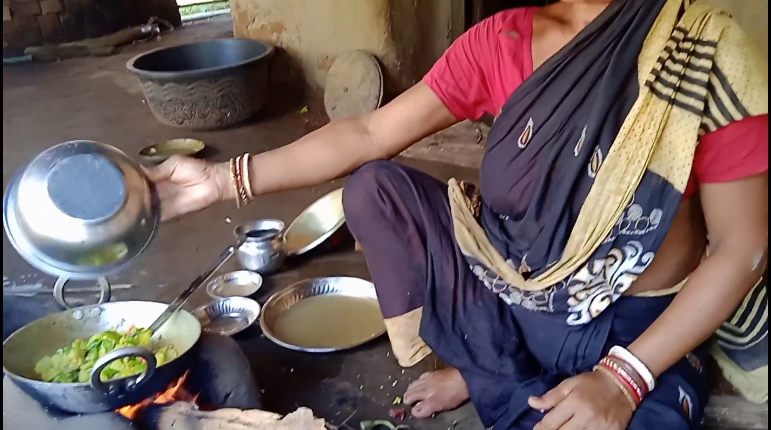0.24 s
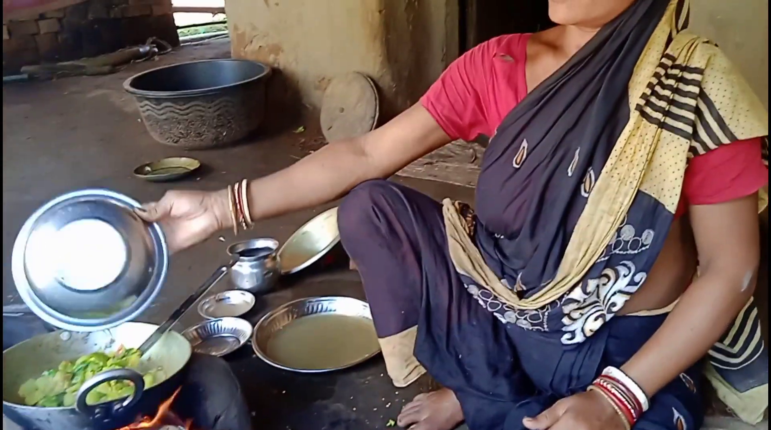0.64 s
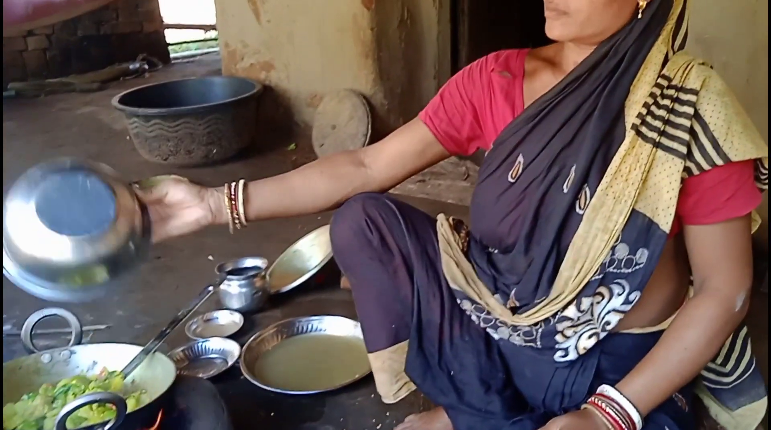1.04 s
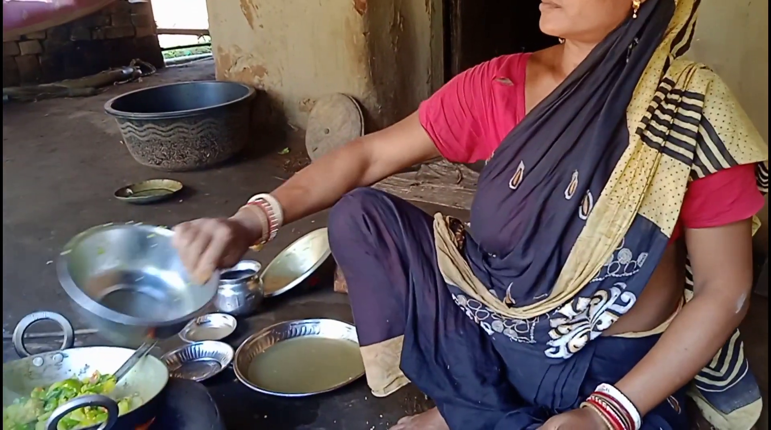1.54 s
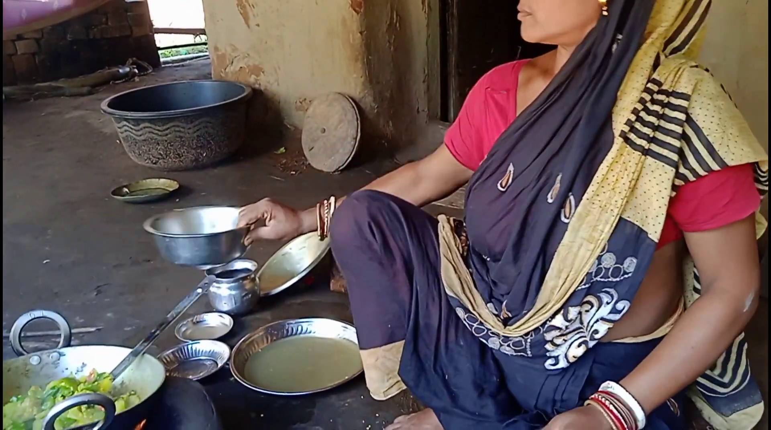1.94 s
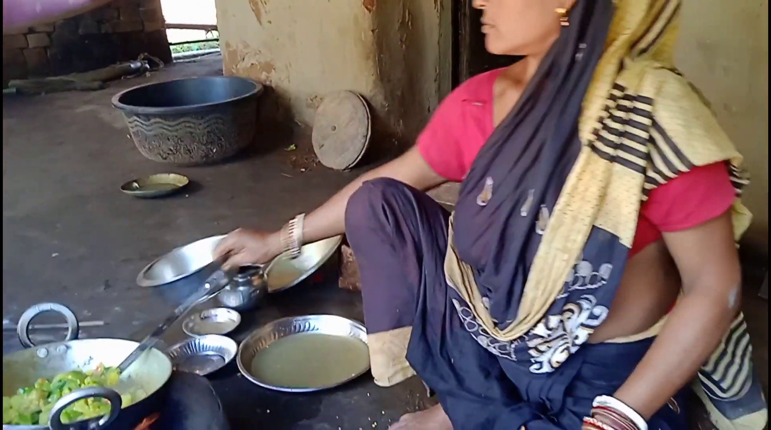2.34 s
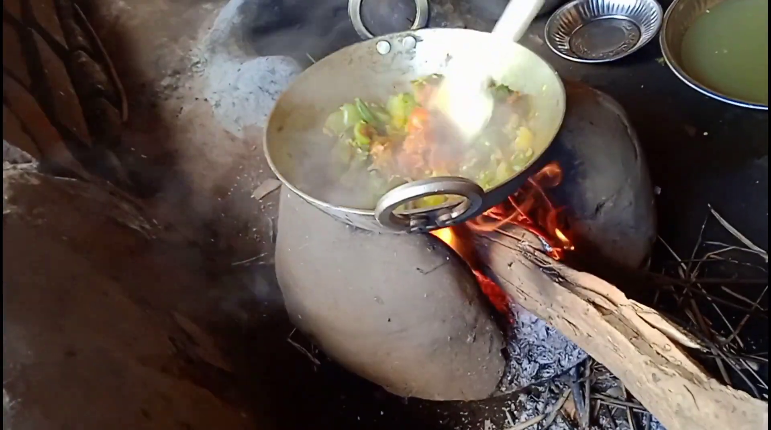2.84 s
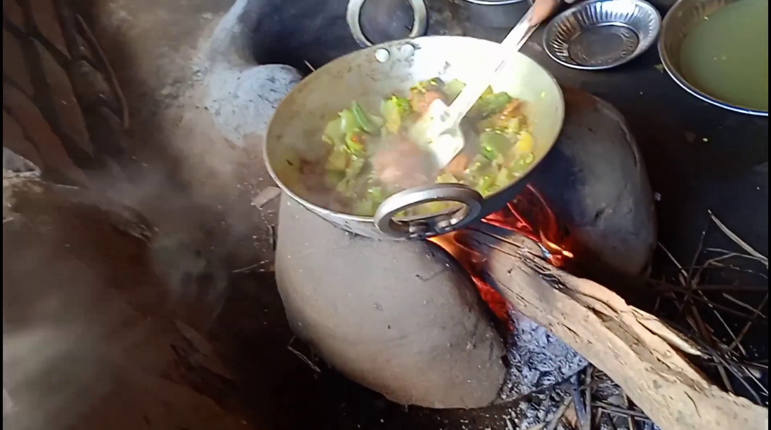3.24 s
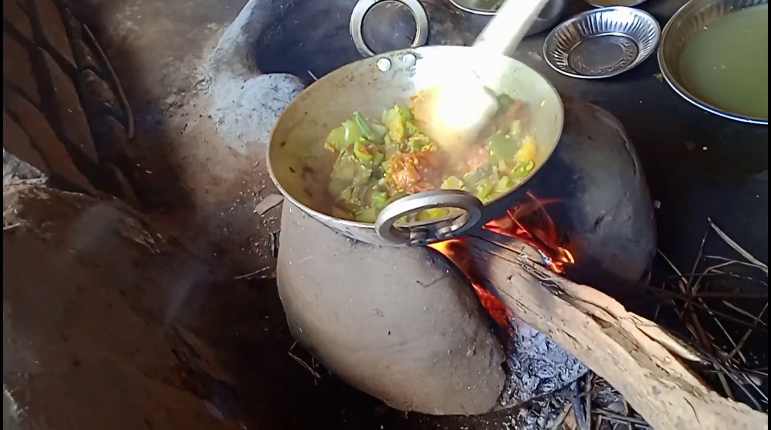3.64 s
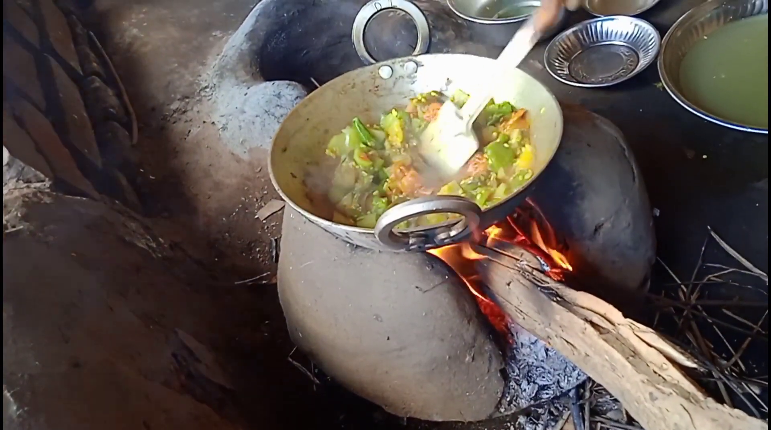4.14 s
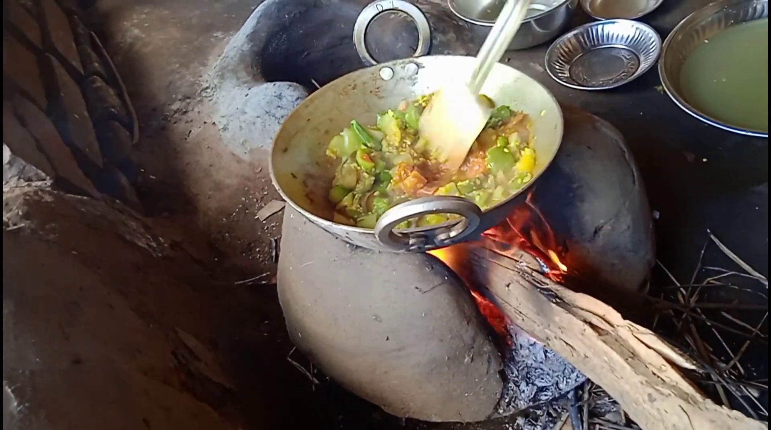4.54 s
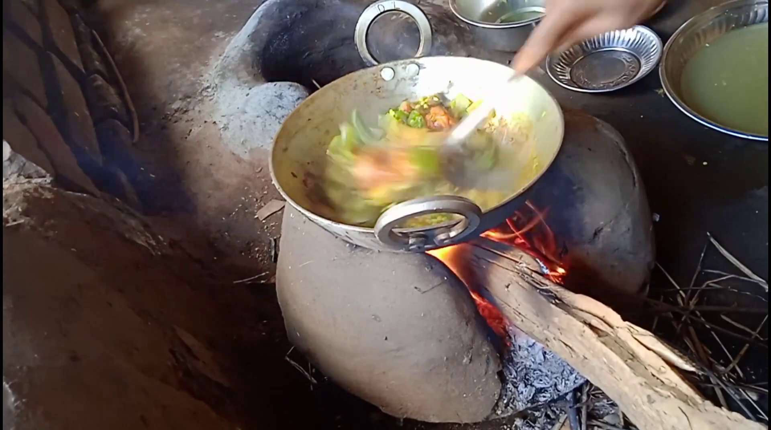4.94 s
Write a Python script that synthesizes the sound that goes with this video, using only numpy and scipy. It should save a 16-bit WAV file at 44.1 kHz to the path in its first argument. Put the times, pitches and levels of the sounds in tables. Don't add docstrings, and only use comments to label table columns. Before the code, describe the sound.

Steady bright frying sizzle, first across the floor then close by, with soft thumps, faint bowl ticks and metallic spatula strikes near the end.

```python
import sys
import numpy as np
from scipy import signal
from scipy.fft import rfft, irfft, next_fast_len
from scipy.io import wavfile
from scipy.ndimage import uniform_filter1d

SR = 44100
rng = np.random.default_rng(int(sys.argv[2]) if len(sys.argv) > 2 else 0)


def materialize(psi):
    bounded = np.clip(np.atleast_2d(psi).T, -1, 1)
    quanta = np.round(bounded * 32767).astype(np.int16)
    wavfile.write(sys.argv[1], SR, quanta)


def level_to_linear(level):
    exponent = np.asarray(level, float) / 20
    return 10 ** exponent


N = 228879
CUT_S = 1.662


def evened(x):
    return x / np.sqrt(np.mean(x ** 2) + 1e-20)


def read(points, hz):
    f, value = np.transpose(points)
    return np.interp(np.log(hz + 1), np.log(f + 1), value, -120, -120)


def add(mix, s, sound):
    part = mix[round(s * SR):][:len(sound)]
    part += sound[:len(part)]


def colour(x, points):
    size = next_fast_len(len(x))
    gain = level_to_linear(read(points, np.fft.rfftfreq(size, 1 / SR)))
    return evened(irfft(rfft(x, size) * gain, size)[:len(x)])


def resonate(x, hz, width):
    turn = np.exp(2j * np.pi * np.cumsum(hz * np.ones(len(x))) / SR)
    r = np.exp(-np.pi * width / SR)
    return 2 * (turn * signal.lfilter([1 - r], [1, -r], x / turn)).real


def drift(x, size, wide, long, depth_db, shared_db):
    overlap = size * 3 // 4
    z = signal.stft(x, nperseg=size, noverlap=overlap)[2]
    patches = uniform_filter1d(rng.standard_normal(z.shape), wide, 0)
    patches = evened(uniform_filter1d(patches, long, 1))
    flicker = evened(uniform_filter1d(rng.standard_normal(z.shape[1]), size=12))
    z = z * level_to_linear(depth_db * patches + shared_db * flicker)
    return signal.istft(z, nperseg=size, noverlap=overlap)[1][:N]


def bubbles(spread_db, hiss, patchy_db, flicker_db, whistle_db):
    bursts_per_s = 3000
    size = level_to_linear(spread_db * np.minimum(rng.exponential(1, N), 5)) * rng.choice([-1., 1.], N)
    crackle = evened(size * (rng.random(N) < bursts_per_s / SR)) + hiss * rng.standard_normal(N)
    patchy = drift(crackle, 256, 3, 30, patchy_db, flicker_db)
    return drift(patchy, 1024, 2, 10, whistle_db, 0)


def follow(t, near):
    # top of the swell in seconds, swell in dB,
    # length in seconds, depth from -1 (skim) to 1 (deep).
    stirs = [(0.933, 2, 0.056, 0.039), (0.634, 0.5, 0.15, -0.23), (1.675, 3, 0.096, -0.091),
             (1.917, 3.5, 0.31, 0.046), (2.245, 3, 0.27, -0.029), (3.143, 1.5, 0.12, 0.56),
             (3.44, 4, 0.13, 0.22), (3.6, 0, 0.11, -.3), (3.838, 1, 0.22, 0.82), (4.192, 4, 0.37, -0.24),
             (4.272, 1.5, 0.2, 0.75), (4.425, 0.5, .12, 0.23)]
    # time in seconds, boil in dB.
    boil_far = [
        (0, 4.5),
        (.5, 1),
        (1.18, -1),
        (1.27, -2.5),
        (1.66, -5),
    ]
    # time in seconds, boil in dB.
    boil_near = [
        (1.66, 0.5),
        (1.85, 2),
        (2.3, 1.5),
        (2.5, -0.5),
        (2.85, 0.3),
        (3.3, -2),
        (3.8, 2),
        (4.1, 0.5),
        (4.8, -3.5),
        (5.19, -1.5),
    ]
    # far level in dB, near level in dB, then dB per dB of boil, of swell and of deep swell.
    body, bright, mist = (-56, -51.5, 0.59, 0.74, 1.2), (-55, -55, 0.46, 1.05, -2.3), (-57.5, -57, 1.32, -0.07, 0)
    low, fire = (-67.5, -68.5, 0.55, 1.6, -0.5), (-66.5, -68, .1, 0.4, 3.5)
    s, swell_db, length, depth = np.transpose(stirs)[:, :, None]
    bump = swell_db * np.cos(np.pi * np.clip((t - s) / length, -.5, .5)) ** 2
    bump = bump * np.where(s > CUT_S, near, 1 - near)
    early, late = (np.interp(t, *np.transpose(boil)) for boil in (boil_far, boil_near))
    drives = np.where(t > CUT_S, late, early), bump.sum(0), (depth * bump).sum(0)
    return [far_db + near * (near_db - far_db) + np.dot(shares, drives)
            for far_db, near_db, *shares in (body, bright, mist, low, fire)]


def fizz(burst, near, body_db, bright_db):
    # frequency in Hz, level in dB per Hz.
    far_colour = [(710, -1), (1200, 1.5), (1410, -5.5), (1680, -2.5), (1860, 3), (2240, 5.5), (3080, 4.5),
                  (3440, 6), (4010, 6), (4320, -5), (5030, -19), (5850, -16), (6320, -19), (8200, -26),
                  (9000, -31), (11700, -44.5), (19800, -120)]
    # frequency in Hz, level in dB per Hz.
    near_colour = [(710, -19), (1200, -14), (1440, -5.5), (1740, -7), (1970, -9.5), (2240, -4.5),
                   (2380, -2.5), (2760, -5.5), (3080, -3), (3810, -2.5), (5070, -9), (6370, -3), (7050, -5),
                   (8270, -21.5), (9000, -23), (11700, -30.5), (19800, -120)]
    # frequency in Hz, width in Hz, level in dB.
    hum = [(715, 19, -8), (1466, 8.4, -5), (1624, 11, -4.5), (1895, 3.6, 3), (2000, 29, 5.5),
           (2040, 41, -2), (2413, 14, -2.5), (2530, 53, 0.5), (2710, 21, 3), (2856, 72, 3.5),
           (3250, 16, -5), (3340, 21, -14), (3780, 19, -3), (6130, 40, -14), (6020, 14, -10)]
    wall = evened(sum(level_to_linear(db) * evened(resonate(burst, hz, width)) for hz, width, db in hum))
    out = np.zeros(N)
    for share, shape, wall_db in (1 - near, far_colour, -19), (near, near_colour, -7.5):
        both = colour(burst, shape) + level_to_linear(wall_db) * wall
        body = signal.oaconvolve(both, signal.firwin(101, 4800, fs=SR), "same")
        out += share * (level_to_linear(body_db) * evened(body) + level_to_linear(bright_db + 1.02) * evened(both - body))
    return out


def fire_and_room(near, wash_db, fire_db):
    # frequency in Hz, level in dB per Hz.
    wash_far = [(24, -56), (40, -17), (135, -9.5), (253, -10), (294, -11), (494, -8), (627, -7), (717, -7),
                (1040, -5), (1400, -15.5), (1820, -58), (3080, -120)]
    # frequency in Hz, level in dB per Hz.
    wash_near = [(24, -57), (40, -22), (124, -6.5), (285, -11), (321, -19), (432, -11), (706, -8.5),
                 (772, -11), (1100, -14), (1400, -8), (1820, -35), (3080, -120)]
    fire = bubbles(spread_db=2.5, hiss=1.5, patchy_db=1.2, flicker_db=.5, whistle_db=2.6)
    wash = (1 - near) * colour(fire, wash_far) + near * colour(fire, wash_near)
    flames = signal.sosfiltfilt(signal.butter(2, 250, fs=SR, output="sos"), wash)
    return level_to_linear(wash_db) * (wash - flames) + level_to_linear(fire_db) * flames


def bowl_echo(burst, t):
    turn_s, turn_length_s = 1.31, .14
    echo_db = -69 + 8 * np.clip((t - turn_s) / turn_length_s, 0, 1)
    return level_to_linear(echo_db) * evened(resonate(resonate(burst, 3450, 610), 3450, 610))


def frying():
    # frequency in Hz, level in dB per Hz.
    spray_colour = [(4700, -17), (8000, -12), (10500, -10), (13400, -9.5), (13950, -5), (14500, 2),
                    (14950, 4.5), (15700, 2.5)]
    t = np.arange(N) / SR
    near = np.clip((t - CUT_S) / .002, 0, 1)
    body_db, bright_db, spray_db, wash_db, fire_db = follow(t, near)
    burst = bubbles(spread_db=0.0, hiss=1.0, patchy_db=0.16, flicker_db=-0.2, whistle_db=2.5)
    fine = bubbles(spread_db=-7, hiss=0.99, patchy_db=0.5, flicker_db=3.5, whistle_db=-1.5)
    out = fizz(burst, near, body_db, bright_db) + fire_and_room(near, wash_db, fire_db)
    out += level_to_linear(spray_db) * colour(burst + 0.62 * fine, spray_colour)
    return out + (1 - near) * bowl_echo(burst, t)


def knock(peak_db, hz, t60):
    t = np.arange(6000) / SR
    puff = resonate(rng.standard_normal(len(t)), 1.8 * hz, 0.91 * hz)
    puff = evened(resonate(puff, 1.8 * hz, 0.91 * hz)) * level_to_linear(-60 * t / 0.036)
    sag = np.clip((100 / hz) ** 2, 0, .55)
    turns = np.cumsum(hz * (1 - sag * np.tanh(t / 0.033))) / SR
    swing = level_to_linear(-60 * t / t60) * np.sin(2 * np.pi * (turns - .08))
    tap = (100 / hz) ** 2 * 0.75 * np.exp(-((t - .0005) / .0004) ** 2)
    return level_to_linear(peak_db) * ((swing + 0.34 * puff) * np.minimum(t / 0.0032, 1) - tap)


def ring(modes, t, spot_db, split):
    hz, db, t60 = np.transpose(modes)[:, :, None]
    phase, spot, twin = rng.random((3, len(hz), 1))
    twin_hz = hz * (1 + .012 * (twin + .3))
    pair = np.sin(2 * np.pi * (hz * t + phase))
    pair = pair + split * hz / 6000 * np.sin(2 * np.pi * (twin_hz * t + twin))
    return (level_to_linear(db + spot_db * spot - 60 * t / t60) * pair).sum(0)


def strikes(contacts, striker, vessel, crack_db, crack_t60, treble_db):
    # frequency in Hz, level in dB per Hz.
    crack_colour = [(150, -40), (460, -10), (1400, -15), (2200, -5), (3500, -7), (5000, -10), (6200, -4),
                    (7600, -8), (8600, -19), (11500, -17), (13900, -19), (14800, -8), (15600, -8)]
    t, out = np.arange(12000) / SR, np.zeros(N)
    lowpass = signal.firwin(63, 4800, fs=SR)
    for s, striker_db, vessel_db, thud_db in contacts:
        crack = colour(rng.standard_normal(len(t)), crack_colour) * level_to_linear(crack_db - 60 * t / crack_t60)
        thud = evened(resonate(resonate(rng.standard_normal(len(t)), 500, 520), 500, 520))
        thud = thud * level_to_linear(thud_db - 60 * t / 0.066)
        blade = ring(striker, t, spot_db=7, split=.8) + crack
        dull = signal.oaconvolve(blade, lowpass, "same")
        blade = dull + level_to_linear(treble_db) * (blade - dull)
        sound = level_to_linear(striker_db) * blade + level_to_linear(vessel_db) * ring(vessel, t, spot_db=3, split=.7) + thud
        add(out, s, sound * np.minimum(t / .0015, 1))
    return out


def bangle_ticks():
    # time in seconds, bangle, bowl and thud levels in dB.
    ticks = [
        (1.1925, -47, -49, -63),
        (1.199, -49, -53, -61),
        (1.208, -50, -57, -64),
        (1.224, -55, -52, -66),
        (1.236, -57, -62, -68),
    ]
    # mode in Hz, level in dB, t60 in seconds.
    bowl_modes = [(3009, -13, .09), (3332, -4, .1), (3688, -13, .08), (4400, -6, .05), (4990, 1, .06),
                  (5394, -10, .1), (5755, -11, .06), (6300, -15, .06), (7267, -17, .05)]
    return strikes(ticks, bowl_modes, bowl_modes, crack_db=1.5, crack_t60=.05, treble_db=1.5)


def spatula_strikes():
    # time in seconds, blade, pan and thud levels in dB.
    clinks = [
        (4.0378, -37, -46, -46),
        (4.043, -36, -48, -48),
        (4.0497, -30, -33, -42),
        (4.0555, -28, -42, -38),
        (4.060, -32, -48, -46),
        (4.065, -35, -38, -48),
        (4.071, -36, -46, -52),
        (4.077, -36, -44, -54),
        (4.085, -39, -50, -56),
    ]
    # time in seconds, blade, pan and thud levels in dB.
    clanks = [
        (5.098, -31, -48, -39),
        (5.107, -32, -48, -44),
        (5.1115, -31, -37, -39),
        (5.117, -33, -51, -42),
        (5.129, -36, -54, -48),
        (5.165, -41, -56, -56),
    ]
    # mode in Hz, level in dB, t60 in seconds.
    blade_modes = [(1250, -17, .05), (2260, -9, .06), (3540, -12, .05), (4100, -13, .035), (5300, -15, .05),
                   (5750, -14, .05), (6085, -7, .07), (6300, -11, .08), (6550, -13, .06), (6880, -9, .07),
                   (7300, -11, .05), (7470, -10, .04), (9800, -27, .05)]
    edge_modes = [(727, -13, .12), (1560, -13, .1), (2040, -10, .12), (2126, 2.5, .18), (2170, -11, .13),
                  (2500, -12, .12), (2840, -11, .35), (3540, -12, .12), (5275, -17, .15), (6150, -7, .13),
                  (6880, -10, .1)]
    wall_modes = [(674, -8, .12), (1130, -13, .2), (1583, -4, .3), (1820, -13, .15), (2126, -5, .15),
                  (2396, -11, .18), (2837, 0, .45), (3542, -1, .24), (5270, -11, .22), (5706, -13, .1),
                  (6110, -8, .18), (6896, -10, .13), (7305, -8, .1)]
    out = strikes(clinks, blade_modes, edge_modes, crack_db=-2.5, crack_t60=.07, treble_db=-1.5)
    return out + strikes(clanks, blade_modes, wall_modes, crack_db=-2.5, crack_t60=.07, treble_db=-4.5)


def scrape():
    # time in seconds, pressure in dB, hollow band in Hz.
    drag = [
        (4.13, -64, 645),
        (4.21, -51.5, 1080),
        (4.26, -50, 920),
        (4.3, -53, 730),
        (4.34, -56.5, 700),
        (4.41, -64, 700),
    ]
    lift_s, lift_db_per_s = 4.29, 110
    s, *columns = np.transpose(drag)
    t = np.arange(s[0], s[-1], 1 / SR)
    level_db, hz = (np.interp(t, s, c) for c in columns)
    squeak_db = -50.5 - lift_db_per_s * np.maximum(t - lift_s, 0)
    unevenness = evened(uniform_filter1d(rng.standard_normal(len(t)), 300))
    slips = rng.standard_normal(len(t)) * level_to_linear(2.5 * unevenness)
    hollow = evened(resonate(resonate(slips, hz, 960), hz, 960))
    squeak = evened(resonate(resonate(slips, 6000, 900), 6100, 900))
    sound = level_to_linear(level_db) * hollow + level_to_linear(squeak_db) * squeak
    return s[0], sound * signal.windows.tukey(len(t), .1)


def scene():
    # time in seconds, peak in dB, pitch in Hz, t60 in seconds.
    knocks = [(.328, -56, 95, 0.067), (.934, -58.5, 557, 0.094), (1.5432, -40, 105, 0.055),
              (1.829, -65, 200, 0.046), (1.928, -50.5, 266, 0.049), (2.24, -58, 603, 0.084),
              (2.515, -51.5, 410, 0.028), (2.792, -53, 474, 0.041), (3.161, -56, 306, 0.089),
              (3.4155, -39.5, 283, 0.029), (3.688, -50, 234, 0.059), (3.725, -48, 240, 0.025),
              (4.203, -45, 720, 0.054), (4.211, -44, 1340, 0.03), (4.22, -41.5, 1177, 0.1),
              (4.253, -50, 1200, .05), (4.241, -40, 760, .03), (4.249, -43, 735, 0.066),
              (4.283, -42, 567, 0.088), (4.29, -51, 720, 0.027), (4.312, -44, 725, 0.069),
              (4.348, -41, 538, 0.052), (4.352, -39.5, 734, 0.082), (3.417, -51, 450, 0.061),
              (3.69, -55, 420, .035)]
    mix = frying()
    steel = bangle_ticks() + spatula_strikes()
    add(steel, *scrape())
    mix += signal.sosfilt(signal.butter(4, 240, "highpass", fs=SR, output="sos"), steel)
    for s, *row in knocks:
        add(mix, s, knock(*row))
    return np.array([mix, mix])


def band_limit(x):
    return signal.sosfilt(signal.butter(12, 16880, fs=SR, output="sos"), x)


def record(dry):
    thin = signal.sosfilt(signal.butter(2, 50, "highpass", fs=SR, output="sos"), dry)
    edge = signal.firwin(1023, 15590, window=("kaiser", 9), fs=SR)
    return band_limit(signal.oaconvolve(thin, edge[None], "same"))


dry = scene()
out = record(dry)
materialize(out)
```